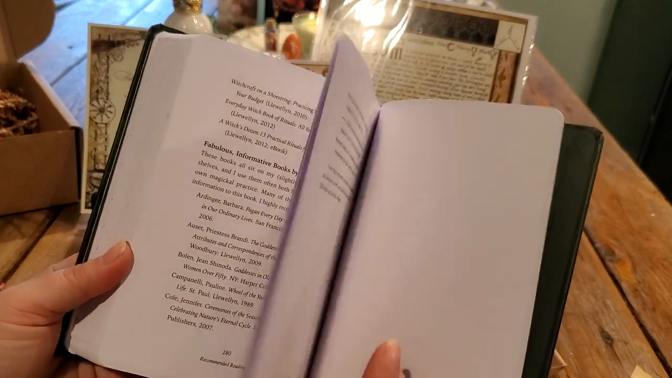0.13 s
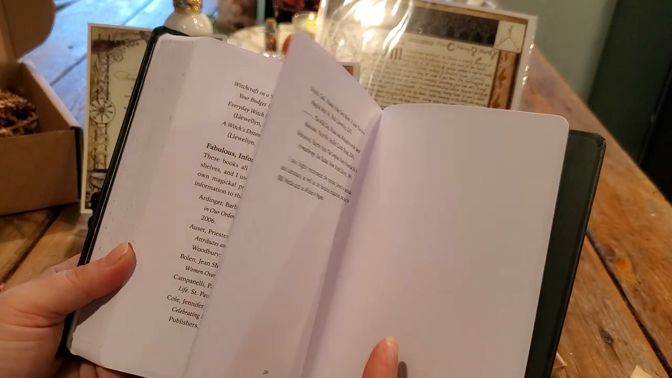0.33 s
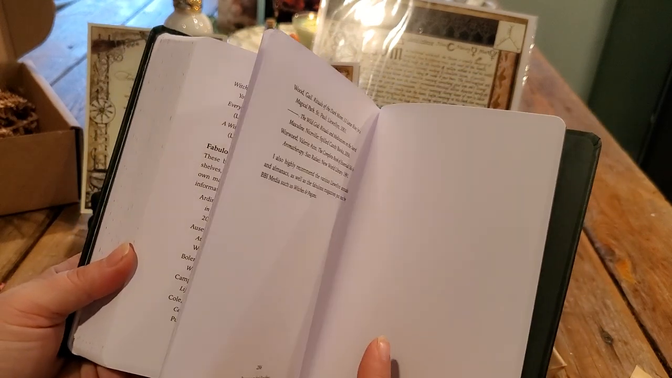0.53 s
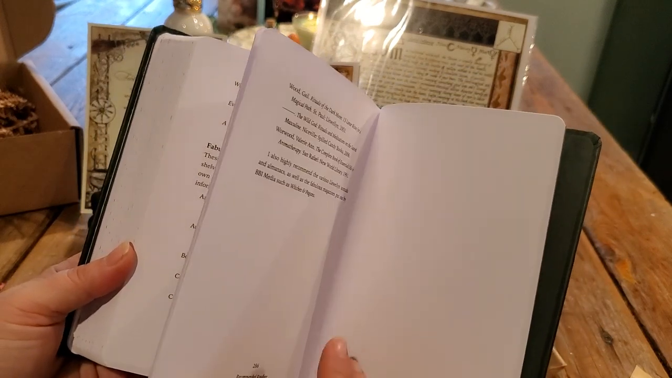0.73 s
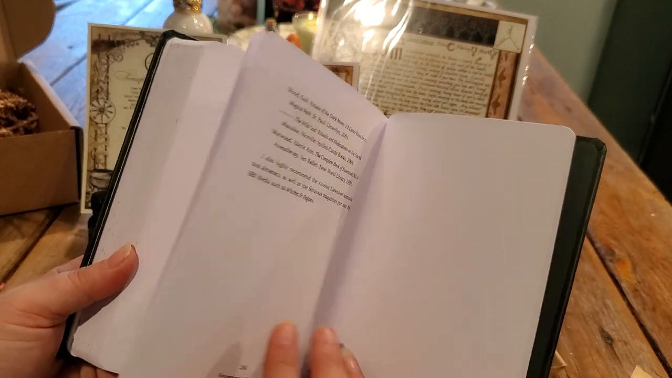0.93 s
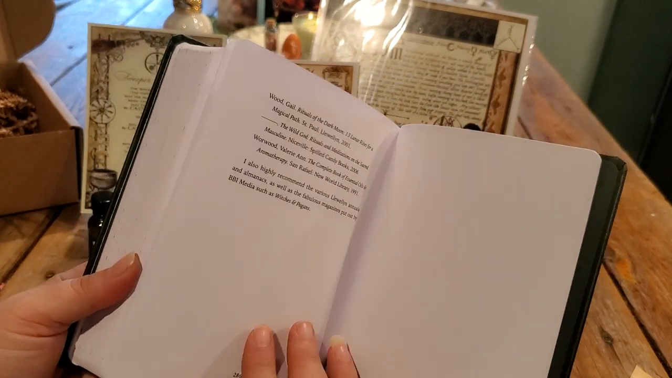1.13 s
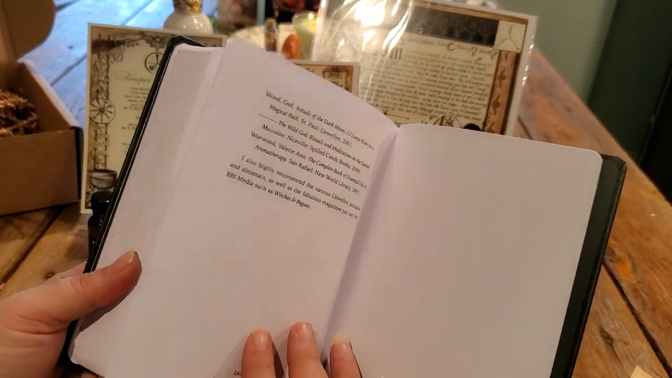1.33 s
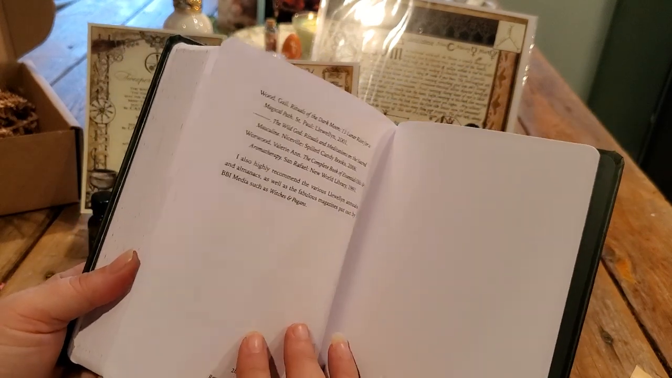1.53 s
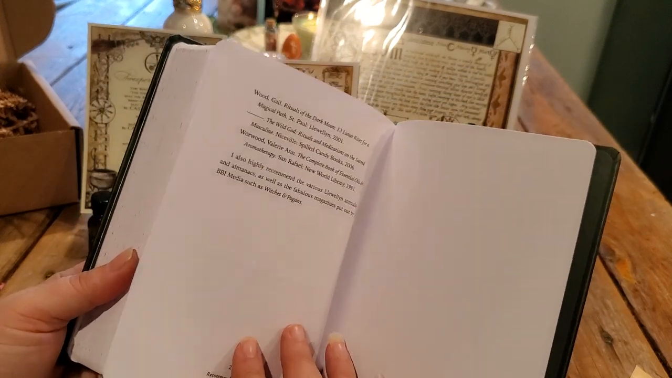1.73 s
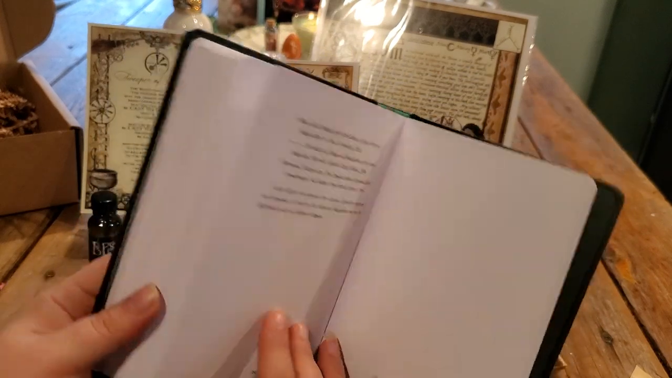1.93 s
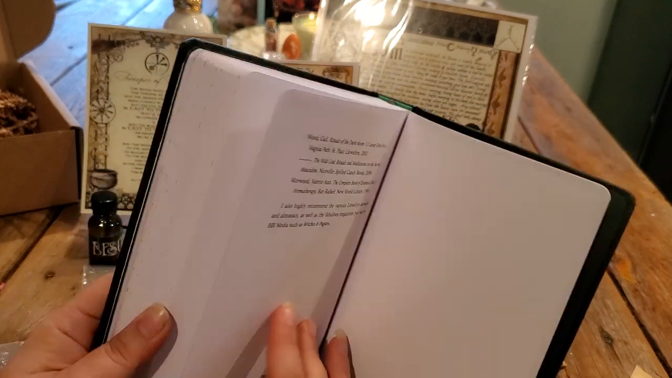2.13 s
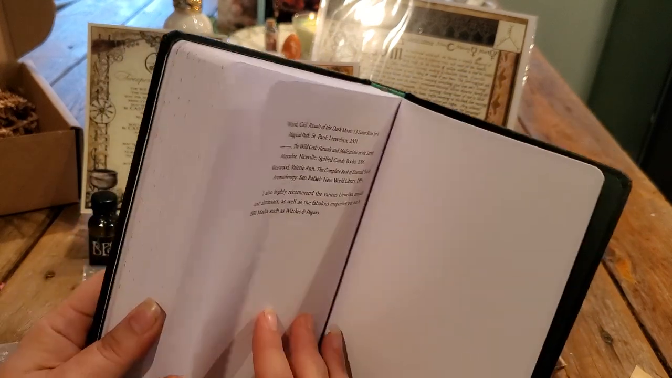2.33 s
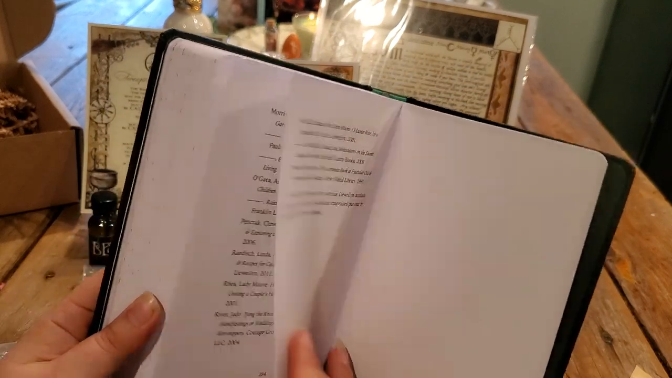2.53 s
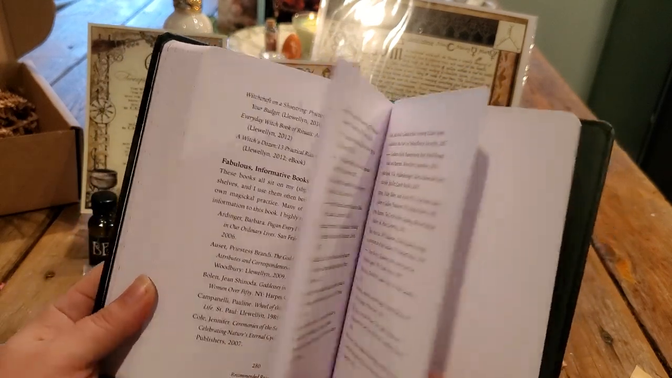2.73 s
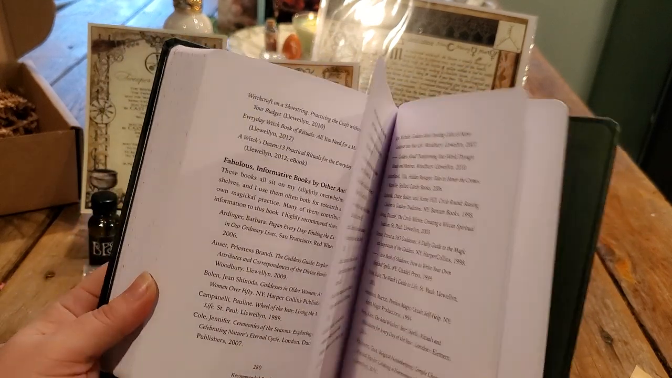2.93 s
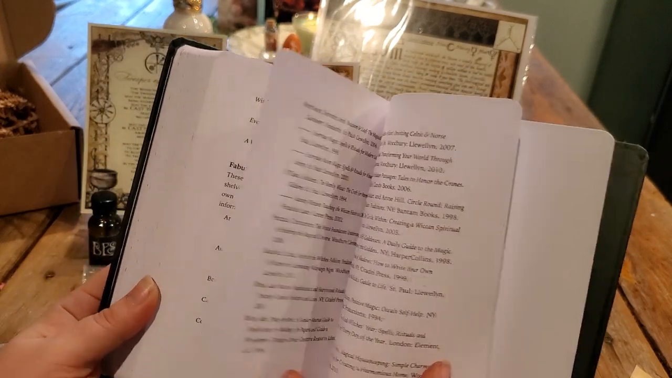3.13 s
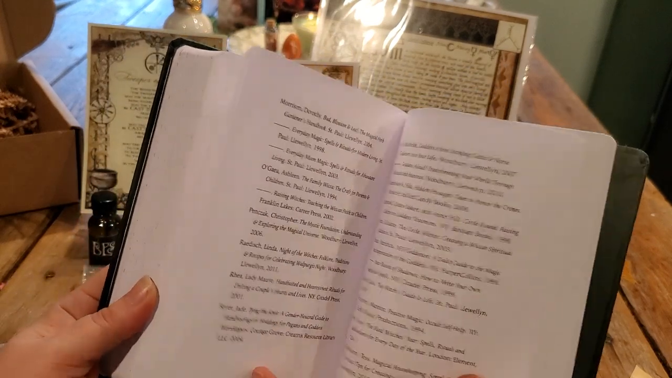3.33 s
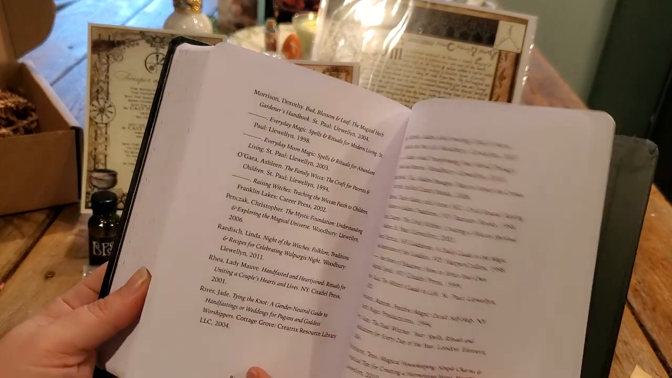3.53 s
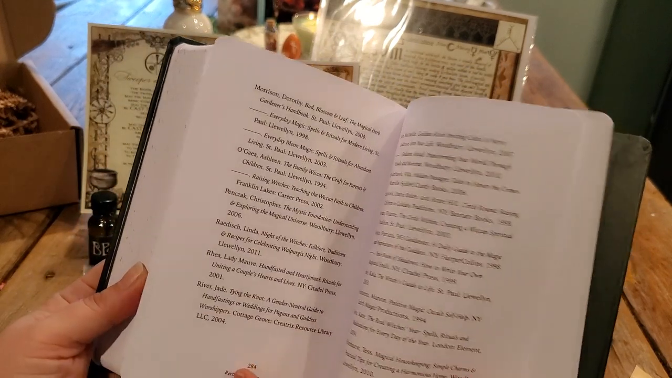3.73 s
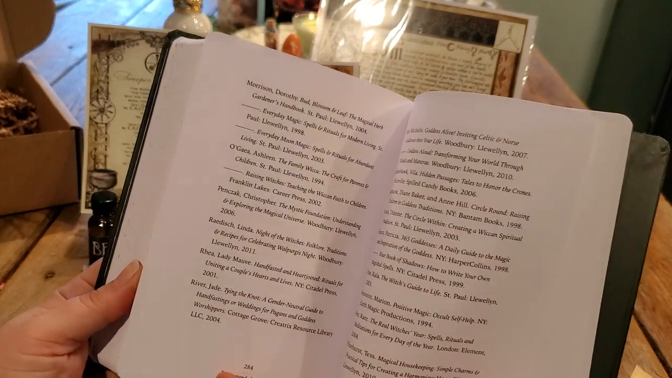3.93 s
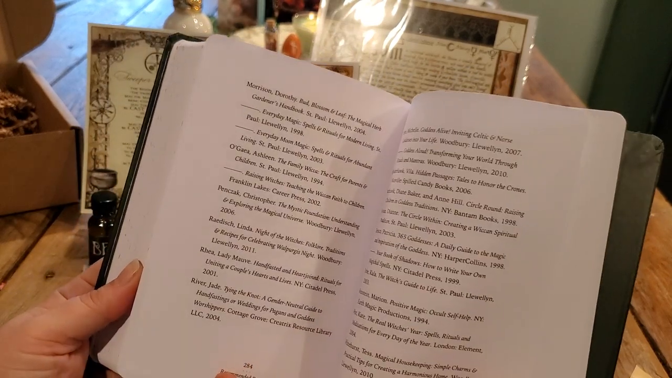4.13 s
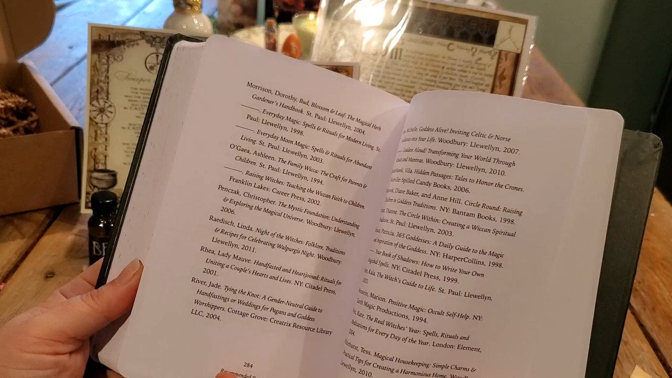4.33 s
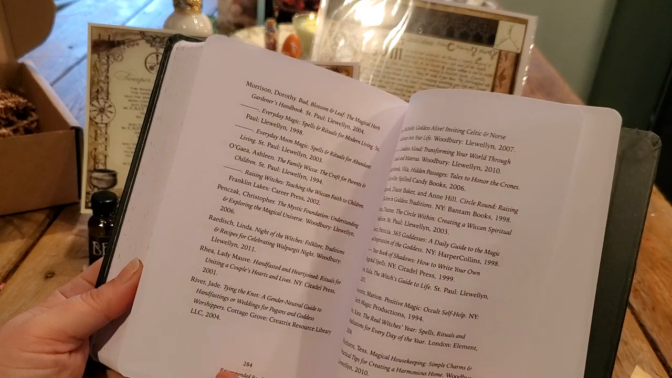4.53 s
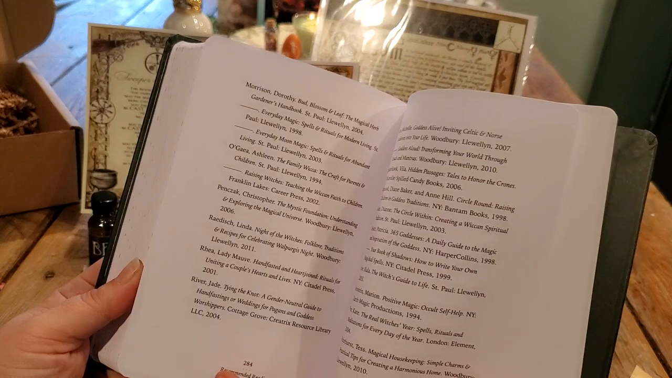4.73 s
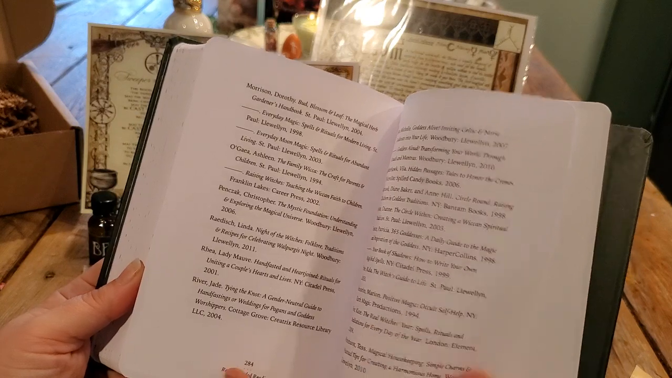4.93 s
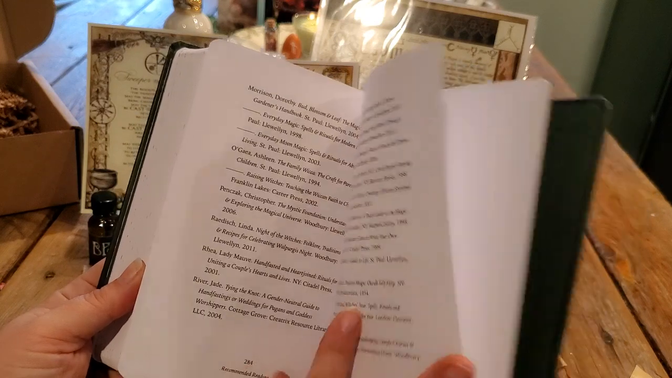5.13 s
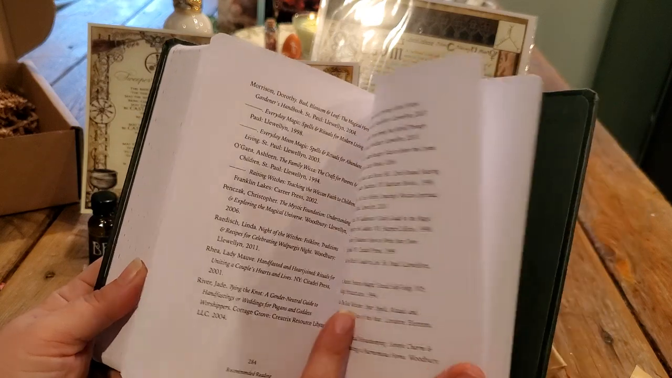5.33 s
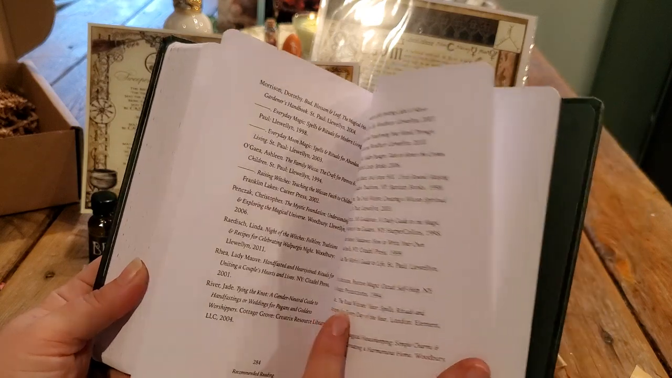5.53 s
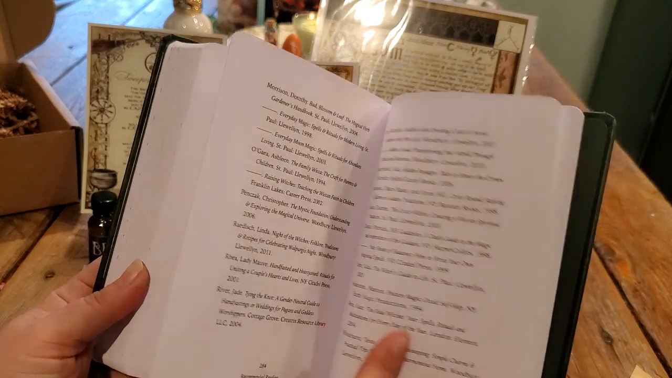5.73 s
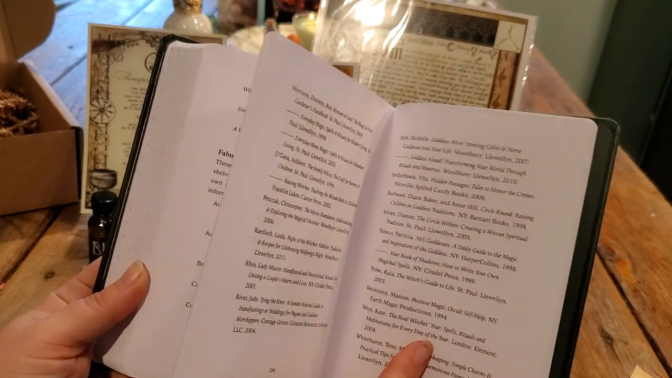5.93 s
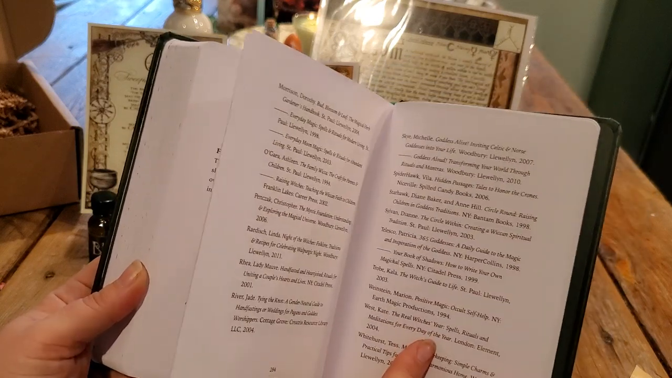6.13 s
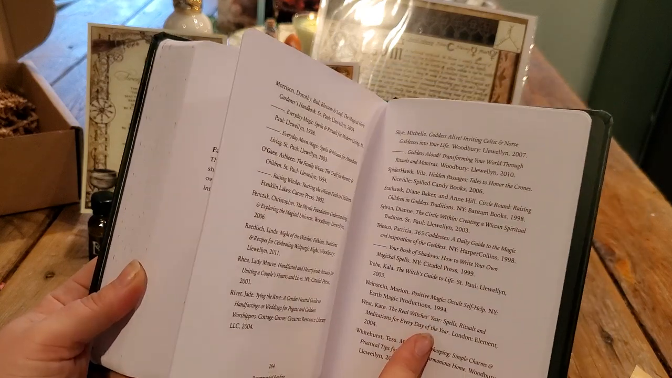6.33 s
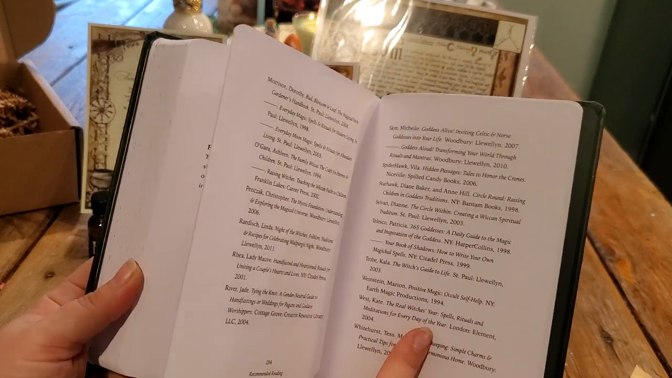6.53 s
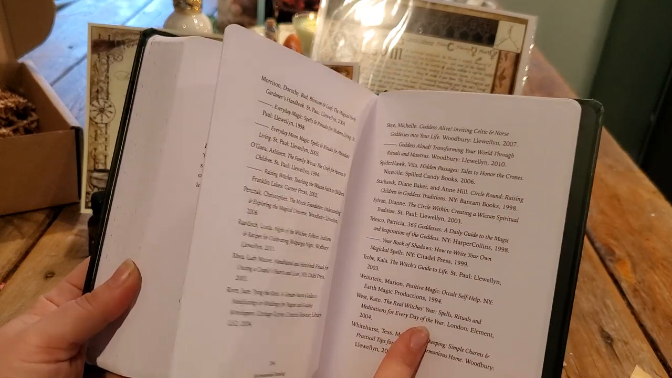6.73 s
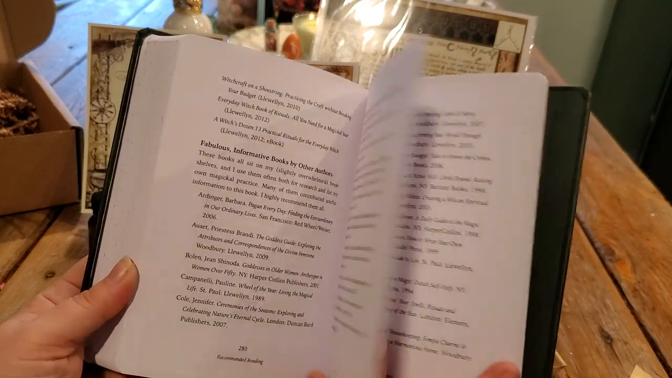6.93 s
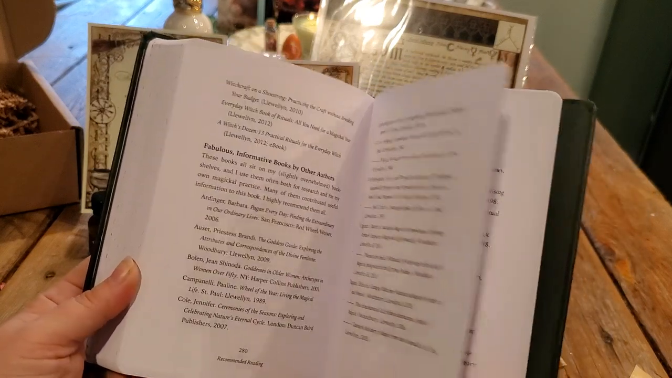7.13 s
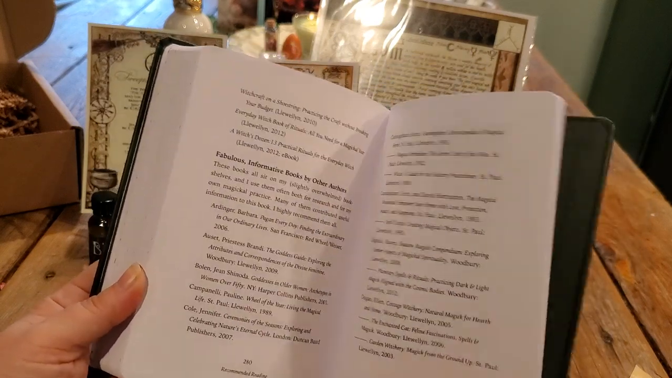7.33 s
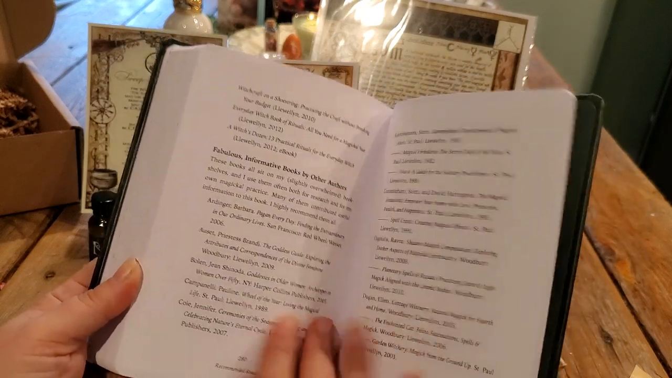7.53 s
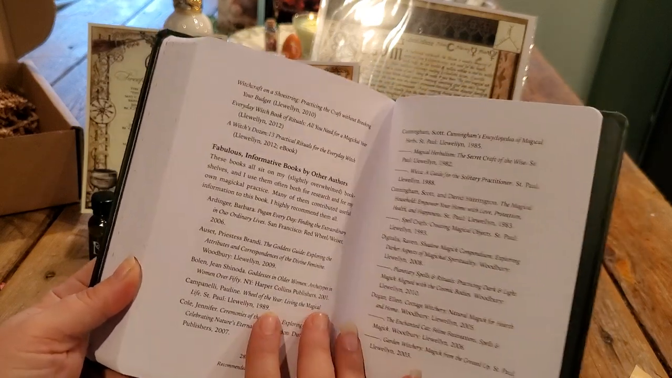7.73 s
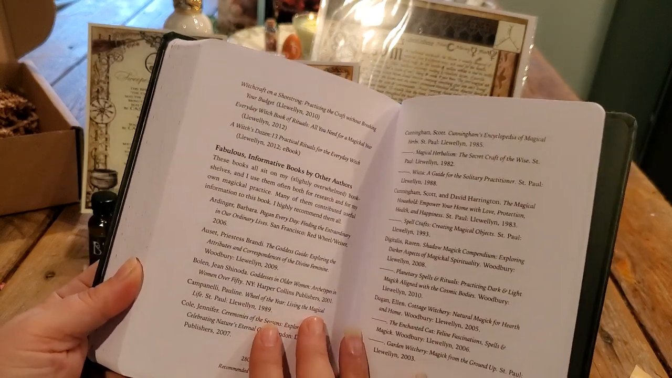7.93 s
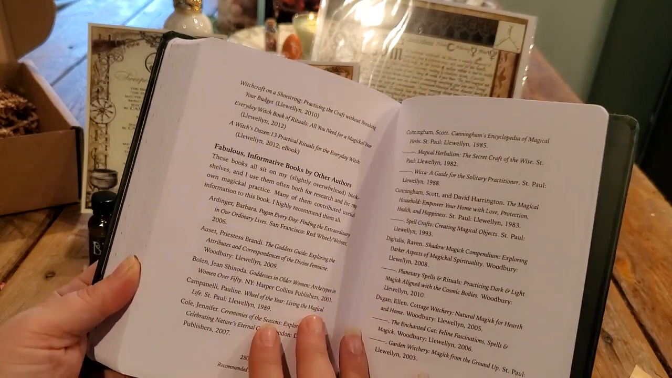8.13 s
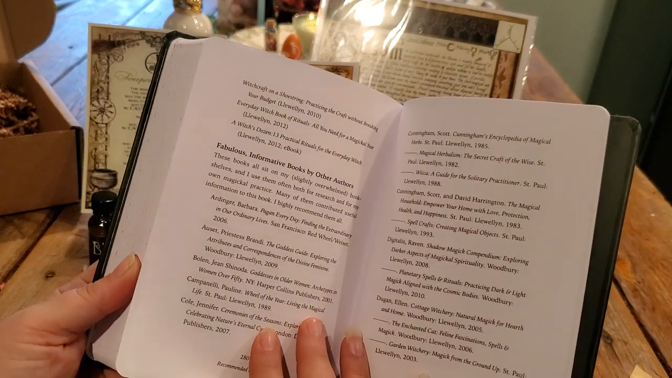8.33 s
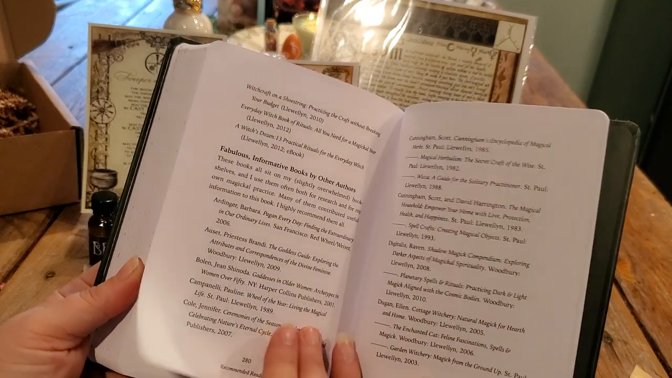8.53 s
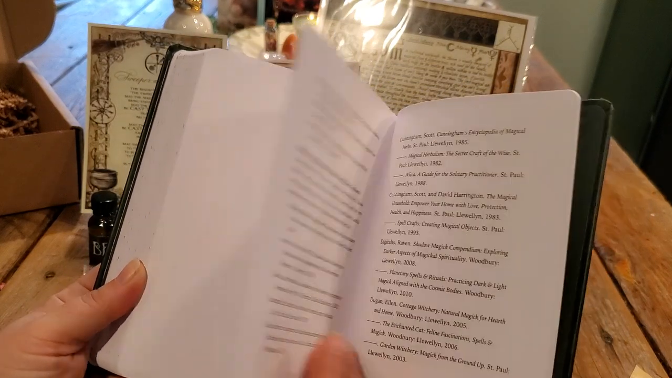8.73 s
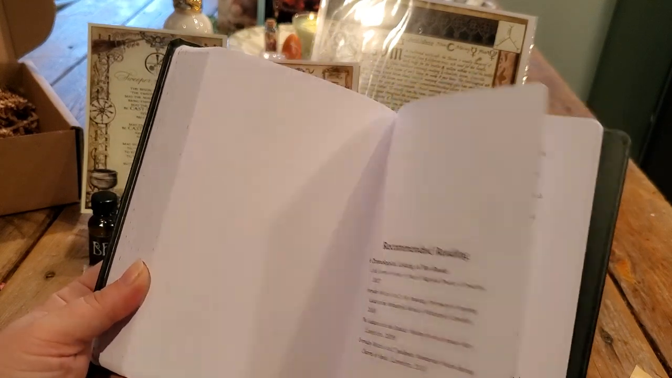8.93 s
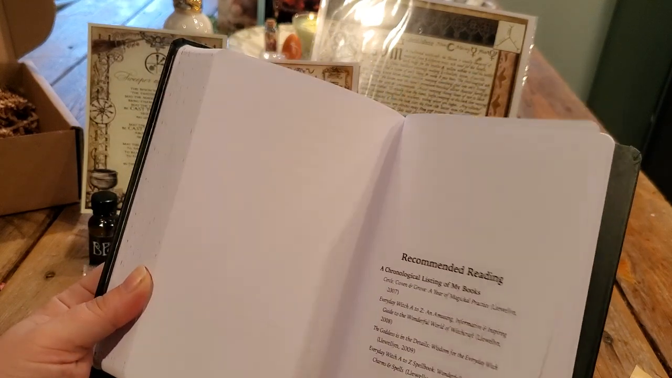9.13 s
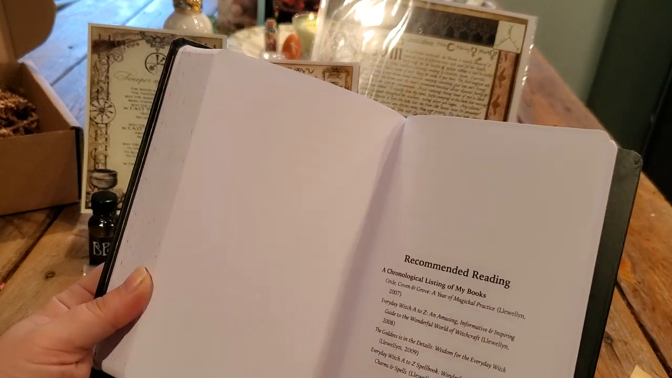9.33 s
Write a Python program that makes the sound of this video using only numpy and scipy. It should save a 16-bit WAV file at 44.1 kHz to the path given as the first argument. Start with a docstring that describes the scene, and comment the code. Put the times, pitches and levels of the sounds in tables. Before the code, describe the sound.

Close, gentle page turning in a small quiet room: papery slides, faint swishes and ticks, with a single sharp crack as one sheet snaps free.

```python
"""In a small room with a low hum, pages of a hardcover book are turned by hand, close by. Sheets slide and
flex: tiny random slips drive the ring of the bent paper, a dry scrape and a fine fizz. Sheets buckle with soft
snaps, made of a jolt and a burst of noise, and fingertips tap the paper twice; edges tick, and smooth bands of
noise give faint swishes and puffs of air. One sheet catches and flicks free with a loud crack."""
import sys
import numpy as np
from scipy import signal
from scipy.fft import rfft, irfft
from scipy.io import wavfile

SR = 44100
rng = np.random.default_rng(int(sys.argv[2]) if len(sys.argv) > 2 else 0)


def persist_wave(psi):
    """Save psi, clipped to +-1, as 16-bit WAV."""
    counts = np.round(np.clip(psi, -1, 1) * 32767).astype(np.int16)
    wavfile.write(sys.argv[1], SR, np.atleast_2d(counts).T)


N = 414319
TIME = np.arange(N) / SR  # seconds


def amp(db):
    """Turns decibels into a gain."""
    return 10 ** (np.asarray(db) / 20)


def unit(x):
    """Scales a sound to an average strength (rms) of 1."""
    return x / np.sqrt(np.mean(x ** 2) + 1e-20)


def read(points, hz):
    """Reads a curve between its points, spaced by pitch as the ear does (log frequency)."""
    f, value = np.transpose(points)
    return np.interp(np.log(hz + 1), np.log(f + 1), value)


def add(mix, s, sound):
    """Mixes a sound in, starting at s seconds."""
    part = mix[max(round(s * SR), 0):][:len(sound)]
    part += sound[:len(part)]


def colour(x, points, size=4096):
    """Gives a sound the (Hz, dB) shape with a filter that never sounds before its input."""
    hz = abs(np.fft.fftfreq(size, 1 / SR))
    log_gain = np.log(amp(read(points, hz)))
    minimum_phase = np.exp(np.conj(signal.hilbert(log_gain)))
    taps = np.fft.ifft(minimum_phase).real
    return signal.oaconvolve(x, taps[:size // 2])[:len(x)]


def resonate(x, hz, width):
    """Rings at hz with a gain of about 1; hz may be a curve, and a wider ring (Hz) dies sooner."""
    turn = np.exp(2j * np.pi * np.cumsum(hz * np.ones(len(x))) / SR)
    r = np.exp(-np.pi * width / SR)
    shifted = x / turn + 1e-18  # the ring pitch moved to 0 Hz; the tiny offset avoids vanishing numbers
    smooth = signal.lfilter([1 - r], [1, -r], shifted)
    return 2 * (turn * smooth).real


def drift(rate, count=N):
    """A slow random curve around 0, with rate new values per second joined by straight lines."""
    knots = rng.standard_normal(4096)
    return np.interp(np.arange(count) * rate / SR, np.arange(len(knots)), knots)


def place(x, pan_db):
    """Sets a sound between the two microphone ports; the left one hears it one sample later."""
    left = amp(pan_db)
    return np.array([left * np.roll(x, 1), x]) * 2 / (1 + left)


def swells(rows, octaves, pan_db):
    """Each row is a band of noise that rises and dies away smoothly."""
    out = np.zeros(N)
    for (s, db, hz, length), noise in zip(rows, rng.standard_normal((len(rows), SR))):
        edges = np.minimum(hz * 2 ** (np.array([-.5, .5]) * octaves), SR / 2 - 1)
        band_filter = signal.butter(2, edges, "bandpass", fs=SR, output="sos")
        band = signal.sosfilt(band_filter, noise)[-int(length * SR):]
        add(out, s - length / 2, amp(db - 5.5) * unit(band * np.hanning(len(band))))
    return place(out, pan_db)


def hum():
    """A machine in the room: a few wavering tones that swell and dip together."""
    # The tones of the machine. Each row: pitch in Hz, level in dB, waver from 0 to 1.
    hum_tones = [(53.6, -75.5, 0.3), (107.3, -64, 0.1), (169.2, -75, 0.7), (210.9, -53, 0.23),
                 (291, -79.5, 0.72), (352.7, -73.5, 1)]
    # How the hum swells and dips. Each row: time in seconds, level in dB (only its changes count).
    hum_level = [(0.0, -55.5), (0.05, -53.5), (1.83, -55.5), (2.77, -52), (4.13, -55.5), (4.18, -60.5),
                 (4.39, -52), (4.71, -61), (4.79, -55.5), (5.07, -55.5), (5.18, -52), (6.14, -55.5),
                 (9.28, -53), (9.39, -54)]
    lag_s, left_db = .00025, 0.8  # the hum reaches the left port later and a little louder
    s, level_db = np.transpose(hum_level)
    swell = amp(np.interp(TIME, s, level_db - level_db.mean()))
    heard = np.array([TIME - lag_s, TIME])
    tones = np.zeros((2, N))
    for hz, db, waver in hum_tones:
        wavering = 1 + waver * (drift(11) + 1j * drift(15))  # changes both strength and phase
        tone = (wavering * np.exp(2j * np.pi * hz * heard)).real
        tones += amp(db) * unit(swell * tone)
    return tones * amp([[left_db / 2], [-left_db / 2]])


def hiss():
    """Faint shaped noise; the two sides share its low part and differ more in the treble."""
    # The tone colour of the hiss. Each row: frequency in Hz, relative level in dB per Hz.
    hiss_shape = [(150, -29.5), (260, -8), (304, -2.5), (325, -11.5), (361, -4.5), (459, -9.5),
                  (501, -13.5), (546, -12.5), (719, -17), (869, -19.5), (1110, -25), (3830, -36),
                  (5000, -38), (6500, -46.5), (7890, -42.5), (9400, -40), (14400, -40), (16000, -52.5)]
    # How alike left and right are. Each row: frequency in Hz, likeness from 0 to 1.
    likeness = [(60, 0.99), (150, 0.93), (380, 0.39), (950, 0.16), (2380, 0.0075), (5980, 0.024),
                (15000, 0.01)]
    a, b = rng.standard_normal((2, N))
    same = np.clip(read(likeness, np.fft.rfftfreq(N, 1 / SR)), 0, 1)
    partner = irfft(same * rfft(a) + np.sqrt(1 - same ** 2) * rfft(b), N)
    left = amp(-1.2) * unit(colour(a, hiss_shape))
    right = unit(colour(partner, hiss_shape))
    return amp(-64) * np.array([left, right])


def rumble():
    """Low noise that is mostly, but not fully, the same on both sides."""
    # The tone colour of the rumble. Each row: frequency in Hz, relative level in dB per Hz.
    rumble_shape = [(15, -41.5), (25, -27), (38, -10.5), (58, 1.5), (80, 0.5), (125, -1), (180, 5),
                    (250, -4), (330, -26), (600, -48.5)]
    shared, difference = rng.standard_normal((2, N))
    sides = [unit(colour(shared + side * difference, rumble_shape)) for side in (.35, -.35)]
    return amp(-61.0) * np.array(sides)


def puffing():
    """A moving sheet or book pushes air, heard as soft, wide bands of mostly low noise."""
    # A falling sheet pushes air, or the book shifts in the hand.
    # Each row: middle in seconds, relative level in dB, centre in Hz, length in seconds.
    puffs = [(0.21, -46, 123, 0.15), (2.009, -52.5, 253, 0.11), (2.288, -54, 108, 0.2),
             (2.70, -62, 525, 0.096), (2.76, -47.5, 124.5, 0.13), (3.12, -47.5, 140, 0.14),
             (7.61, -53.5, 252, .1), (8.435, -53.5, 300, 0.065), (8.776, -54.5, 330, 0.31),
             (8.824, -52.5, 78, 0.23), (8.95, -60.5, 744, 0.15), (9.1, -53, 137, 0.085),
             (9.194, -47, 137, 0.18), (9.325, -63, 252, 0.28)]
    return swells(puffs, octaves=1.33, pan_db=2.4)


def swishing():
    """A gliding touch on smooth paper gives faint, narrow bands of noise."""
    # A fingertip or page edge glides over smooth paper.
    # Each row: middle in seconds, relative level in dB, pitch in Hz, length in seconds.
    swishes = [(0.985, -68.5, 4430, 0.096), (1.0, -70, 1330, 0.16), (1.69, -69.5, 2680, 0.16),
               (2.045, -62.5, 2490, 0.13), (2.19, -70.5, 4050, 0.2), (2.62, -59, 2680, 0.1),
               (2.85, -67, 8200, 0.27), (4.87, -63, 10160, 0.053), (6.97, -68, 2864, 0.13),
               (7.16, -73, 3070, 0.26), (7.13, -71, 6900, 0.13), (7.33, -66, 4350, 0.14),
               (7.635, -57, 14000, 0.19), (8.59, -76.5, 5710, 0.077), (9.10, -64.5, 4200, 0.12),
               (9.18, -65, 3300, 0.064)]
    return swells(swishes, octaves=0.24, pan_db=-18.0)


def ticking(size=1024):
    """Edges slipping past each other give very short bright ticks."""
    # A paper edge slips off another.
    # Each row: start in seconds, relative level in dB, brightest frequency in Hz.
    ticks = [(0.0803, -59, 10000), (1.0357, -48.5, 5600), (1.0771, -60, 9500), (1.11, -49.5, 6500),
             (1.5041, -64, 8900), (1.8676, -59, 12000), (1.898, -63, 9900), (1.9328, -56, 8400),
             (2.5412, -59.5, 8950), (2.654, -51, 10000), (3.0615, -53, 4500), (3.1162, -34.5, 14000),
             (3.6376, -56, 9000), (5.314, -36.5, 14500), (5.322, -51, 13000), (6.0732, -63, 8960),
             (6.551, -61, 11100), (7.41, -52, 4000), (8.2123, -66, 9000), (8.631, -52, 4500),
             (8.6662, -45.5, 4080), (8.674, -64, 6000)]
    slip_s, shiver_s, shiver_share = 0.00066, .0032, 0.083  # the slip, then the weak shiver that outlasts it
    out, t = np.zeros(N), np.arange(size) / SR
    for (s, db, hz), noise in zip(ticks, rng.choice([-1., 1.], (len(ticks), size))):
        burst = noise * (np.exp(-t / slip_s) + shiver_share * np.exp(-t / shiver_s))
        thin = np.diff(burst, prepend=0)  # takes away the bass
        add(out, s, amp(db - 9) * unit(resonate(thin, hz, 0.405 * hz)))
    return place(out, pan_db=-9)


def snapping(size=4096):
    """Each buckle or tap is one jolt and a short burst of crumple that ring the sheet; low ones are dull."""
    # The sheet buckles; a narrow ring is a soft knock, a wider one a dry crack. The two widest rings, near the
    # end, are fingertips tapping the paper. Each row: start in # seconds, relative level in dB, ring in Hz,
    # width of the ring in Hz, decay in seconds.
    snaps = [(0.074, -53, 1560, 600, 0.0042), (0.132, -47, 1580, 400, .004),
             (0.141, -50, 2100, 700, 0.0098), (0.81, -57, 1510, 600, 0.0044), (0.937, -57, 1340, 450, .003),
             (1.035, -58, 2590, 1000, .0036), (1.505, -57, 2230, 900, 0.0026),
             (1.997, -52.5, 980, 600, 0.0023), (2.103, -51.5, 1700, 700, 0.007),
             (2.542, -55, 2030, 800, 0.0017), (2.595, -53, 2400, 800, 0.0059),
             (2.675, -44, 1450, 550, 0.0077), (3.0668, -39, 3270, 1400, .001),
             (3.079, -32.5, 2230, 800, 0.0032), (3.084, -30.5, 2040, 700, 0.0052),
             (3.092, -35, 2650, 1000, .005), (3.1029, -28.5, 3250, 1300, .004),
             (3.1165, -27, 3000, 1300, 0.0027), (3.119, -18.5, 3400, 1290, .0025),
             (3.122, -30, 1714, 601, 0.0027), (3.125, -28, 2533, 998, .008),
             (3.189, -36.5, 1670, 600, 0.01), (3.435, -46, 1400, 550, .007),
             (3.636, -45, 1210, 400, 0.0059), (4.848, -50.5, 1780, 400, 0.014),
             (5.102, -46, 1390, 550, 0.017), (6.073, -49, 1540, 219, 0.0018),
             (6.96, -51.5, 1320, 350, 0.0035), (7.266, -54.5, 1100, 450, 0.0096),
             (7.413, -50, 2320, 1200, .0015), (7.603, -47, 1104, 350, 0.0063),
             (8.4258, -49, 2020, 4000, 0.00099), (8.666, -41, 2200, 3500, 0.00058)]
    # What a buckling sheet gives off. Each row: frequency in Hz, relative level in dB.
    sheet_shape = [(100, -22.5), (350, -12.5), (600, -5.5), (880, -6), (1200, -3.5), (1700, -9.5),
                   (2300, -11), (3200, -6.5), (4500, -7), (6000, -12), (16000, -1.5)]
    even_s = .0018  # a buckle with this decay is half jolt, half crumple; longer ones crumple more
    top = 2.4  # where a buckle's treble starts to fall, as a multiple of its ring frequency
    out, t = np.zeros(N), np.arange(size) / SR
    click = 1. * (t == 0)
    for (s, db, hz, width_hz, decay), noise in zip(snaps, rng.standard_normal((len(snaps), size))):
        crumple = decay / (decay + even_s)
        jolt = unit(colour(resonate(click, hz, width_hz), sheet_shape))
        burst = unit(colour(resonate(noise * np.exp(-t / decay), hz, width_hz), sheet_shape))
        softness = signal.butter(2, min(top * hz, SR / 3), fs=SR)
        snap = signal.lfilter(*softness, (1 - crumple) * jolt + crumple * burst)
        add(out, s, amp(db - 18) * unit(snap))
    return place(out, pan_db=-7.0)


def grains(count, per_s, spread_db, clump_db):
    """Tiny slips of fibre on fibre: random clicks of uneven size, stronger in clumps."""
    size, sign, chance = rng.random((3, SR))[:, :count]
    size_db = spread_db * np.minimum(-np.log(1 - size), 5)
    clicks = amp(size_db) * np.sign(sign - .5) * (chance < per_s / SR)
    return unit(clicks * amp(clump_db * drift(70, count)))


def between_leaves(x):
    """Sound bounces in the gap between leaves; the colour shifts as the gap opens and shuts."""
    echo_s = .0005  # typical round trip in the wedge of air
    at = np.arange(len(x))
    delay = echo_s * SR * np.exp(.3 * drift(5, len(x)))
    return x + .22 * np.interp(at - delay, at, x)


def sliding(flex_db, scrape_db, fizz_db, ring_hz, scrape_hz):
    """Slips on one patch of paper drive the ring of the bent sheet, a dry scrape and a fine fizz."""
    # The three tone colours; a sliding sheet gives off little bass.
    # Each row: frequency in Hz, relative level in dB.
    flex_shape = [(200, -37), (600, -10), (900, -3.5), (1130, 2.5), (1700, -2.5), (2300, -5), (3200, -2),
                  (6000, -26), (16000, -36)]
    scrape_shape = [(700, -29.5), (1800, -5), (2900, -0.5), (3800, -3.5), (4700, -0.5), (5600, -6.5),
                    (7000, -3.5), (9000, -13), (16000, -30.5)]
    fizz_shape = [(3000, -28), (6000, -3), (8500, 1.5), (10000, 1), (12500, -3), (15500, -3)]
    count = len(flex_db)
    bending = resonate(grains(count, per_s=3100, spread_db=0.5, clump_db=4.5), ring_hz, 410)
    scraping = resonate(grains(count, per_s=4000, spread_db=2.5, clump_db=3.5), scrape_hz, 2400)
    fibres = grains(count, per_s=14000, spread_db=3.5, clump_db=3.0)
    flex = amp(flex_db - 1.5) * unit(colour(bending, flex_shape))
    scrape = amp(scrape_db - 1.5) * unit(colour(scraping, scrape_shape))
    fizz = amp(fizz_db + 2.4) * unit(colour(fibres, fizz_shape))
    return between_leaves(flex + scrape + fizz)


def stroke(rise, fall, db, flex_db, fizz_db, ring_hz, pan_db):
    """A sheet speeds up and slows down, and its speed sets level and brightness."""
    drop_db, roundness = 10, 1.4  # fall in speed over one rise or fall time; 1 = pointed, 2 = round
    flex_power, fizz_power = 1, 1.1  # how steeply each follows speed; the scrape follows in proportion
    slow_hz, brighter_hz = 3050, 400  # the scrape gets brighter with speed
    slack = 0.069  # share by which the ring sinks as the sheet relaxes
    edge_share = .55  # strength of the patch at the page edge against the one in the middle
    t = np.arange(-2 * rise, 2 * fall, 1 / SR)  # 0 is the moment of top speed
    speed_db = -drop_db * np.maximum(-t / rise, t / fall) ** roundness
    speed = amp(speed_db)
    controls = dict(
        flex_db=db + flex_db + flex_power * speed_db,
        scrape_db=db + speed_db,
        fizz_db=db + fizz_db + fizz_power * speed_db,
        ring_hz=ring_hz * (1 - slack * (1 - speed)),
        scrape_hz=slow_hz + brighter_hz * speed)
    # A page is wide: two patches slide at once and reach the ports differently.
    middle = place(sliding(**controls), pan_db)
    edge = place(sliding(**controls), pan_db)
    return middle + edge_share * edge * [[1], [-1]]


def rubbing():
    """Paper pushed over paper: every stroke, placed by its moment of top speed."""
    # Each row is one push: top speed in seconds, speeding up in seconds, slowing down in seconds,
    # relative scrape level in dB, flexing in dB above the scrape, fizz in dB above the scrape,
    # ring of the bent sheet in Hz, left against right in dB.
    strokes = [ (0.005, 0.021, 0.054, -75, 13.5, -1.5, 1670, -7),
               (0.078, 0.013, 0.027, -65.5, 0, -0.5, 1600, -8),
               (0.143, 0.014, 0.028, -80, 25, 3, 1620, -10),
               (0.2, 0.056, 0.096, -78.5, 11, -2.5, 1250, -15), (0.395, 0.011, .07, -87, 2, 8, 1130, -4),
               (0.97, 0.032, 0.075, -70.5, 5, -14, 1240, -9), (1.049, 0.055, 0.14, -64, -3, -3, 1330, -9.5),
               (1.16, 0.056, 0.081, -68, 0.5, -5, 1520, -9), (1.481, 0.093, 0.12, -76.5, 0, -6.5, 1350, -9),
               (1.68, 0.062, .11, -85, 8, 1, 2120, -18), (1.89, 0.024, 0.031, -69.5, 5.5, 1, 1350, -8),
               (1.94, 0.04, 0.11, -72, -2, 3.5, 1450, -7), (2.04, 0.044, 0.041, -62, -2, -14, 1840, -10),
               (2.119, 0.021, 0.084, -63.5, -0.5, -9, 1470, -14),
               (2.39, 0.15, 0.14, -76.5, 1, -3, 1330, -5), (2.56, 0.031, 0.054, -75, 8, -10, 1790, 3),
               (2.645, 0.055, 0.088, -59, -4.5, -2.5, 1830, -5),
               (2.9, 0.16, 0.065, -63.5, -3.5, -2, 1400, -7.5),
               (3.0, .04, 0.075, -66.5, -0.5, -4.5, 1400, -8),
               (3.084, 0.01, 0.022, -43.5, 9, -6.5, 2020, -5),
               (3.12, 0.028, 0.02, -40.5, 10.5, -8.5, 1751, -2.5),
               (3.18, .04, 0.083, -53.5, 0, -12.5, 1530, -13),
               (3.279, .04, 0.053, -56.5, -0.5, -7.5, 1290, -6),
               (3.36, 0.038, 0.073, -52, 4, -9.5, 1310, -8),
               (3.435, 0.044, 0.039, -52.5, -3.5, -4.5, 1490, -4.5),
               (3.56, 0.066, 0.24, -64.5, 2, -5, 1400, -7),
               (3.648, 0.018, 0.066, -52.5, 4.5, -4.5, 1170, -8),
               (3.82, 0.046, 0.086, -63, 4, -7.5, 1380, -6.5),
               (3.97, 0.061, 0.048, -69.5, 0.5, -4.5, 1440, -8),
               (4.645, 0.057, 0.058, -77.5, 4, -3.5, 1097, -5),
               (4.87, 0.025, 0.05, -76, 4.5, 7, 1520, -4.5),
               (4.99, 0.033, 0.086, -68, 4.5, -3.5, 1460, -4.5),
               (5.056, 0.03, 0.024, -64.5, -3.5, 0, 1420, -8),
               (5.134, .04, 0.045, -55.5, -5.5, -1.5, 1350, -8.5),
               (5.199, 0.059, .11, -60, -9.5, 2.5, 1530, -3.5),
               (5.309, 0.067, 0.039, -68.5, 9.5, 6, 1700, -4),
               (5.374, 0.026, 0.057, -71, 2.5, 6.5, 1700, -7.5), (5.57, .06, 0.11, -67, 7, -6, 1690, -3.5),
               (5.741, 0.035, 0.047, -54.5, 6, -6, 1690, -2), (5.871, 0.078, 0.04, -57, 0, -3, 1910, -2),
               (5.965, 0.036, 0.035, -64, 0, -2, 1900, -2.5), (6.39, 0.048, .06, -82, -4.5, 1.5, 1220, -4),
               (6.565, 0.024, 0.028, -75.5, 8, 6, 1430, -4.5),
               (6.99, 0.066, 0.082, -67.5, 3, -3, 1300, -10.5),
               (7.18, 0.16, 0.12, -72.5, -3.5, 2, 1290, -10.5),
               (7.321, 0.031, .06, -68, -11, 5.5, 1310, -8), (7.41, 0.075, 0.066, -59, 0.5, -3.5, 1190, -6),
               (7.51, .04, 0.068, -72, 6, -1, 1160, -6), (7.61, 0.039, 0.057, -60, 0.5, 7.5, 1120, -4),
               (7.654, 0.036, 0.052, -59, -6, 3.5, 1240, -6), (7.851, .09, 0.079, -74, 3, 1.5, 1260, -11),
               (8.015, 0.064, 0.048, -70, -3, 0.5, 1370, -9.5),
               (8.22, 0.0096, 0.048, -78, 2, 0.5, 1300, -9),
               (8.675, 0.056, 0.063, -61.5, -2.5, -5, 1400, -8),
               (8.74, 0.023, 0.049, -56.5, -9.5, 1, 1720, -8), (8.85, 0.071, 0.084, -72, -13, -1, 1320, -9),
               (8.93, 0.044, 0.071, -64, 8, -0.5, 1440, -17),
               (8.994, 0.042, 0.048, -63, -2.5, -10, 1470, -8), (9.1, .05, 0.067, -62, -5, -7, 1290, -9),
               (9.18, 0.044, 0.088, -67, -5, -5, 1250, -9)]
    out = np.zeros((2, N))
    for s, rise, *rest in strokes:
        start = s - 2 * rise
        before_start = max(round(-start * SR), 0)  # samples that fall before time 0
        sound = stroke(rise, *rest)[:, before_start:]
        for channel in range(2):
            add(out[channel], start, sound[channel])
    return out


def room(x, wet_db, near_db, count=3):
    """Adds quick reflections off the moving book and hands, then the short tail of the room."""
    # The left port faces away. Each row: frequency in Hz, change in dB.
    left_shade = [(200, 4), (2000, 1.5), (4000, -4), (8000, -3), (12500, -2.5), (16000, -10)]
    # How fast the room falls silent. Each row: frequency in Hz, time to fall by 60 dB in seconds.
    fade_times = [(150, 0.74), (800, 0.21), (2000, 0.2), (5000, 0.15), (15000, 0.18)]
    t = np.arange(SR // 2) / SR
    direct = np.array([colour(x[0], left_shade), x[1]])
    centre = direct.mean(0)[None]
    out = direct.copy()
    for k in range(count):
        # The sound moves smoothly between a few random echo patterns.
        share = np.sqrt(2 / count) * np.cos(np.pi * (TIME / .8 + k / count))
        taps = rng.standard_normal((2, len(t))) * (rng.random((2, len(t))) < 7000 / SR)
        near = taps * (t > .0008) * np.exp(-t / 0.0024)
        hz, age, z = signal.stft(taps * (t > .007), SR, nperseg=256)
        fading = z * amp(-60 * age / read(fade_times, hz)[:, None])
        tail = signal.istft(fading, SR, nperseg=256)[1][:, :len(t)]
        for source, echo, db in ((direct, near, near_db), (centre, tail, wet_db)):
            even_echo = echo / np.sqrt(np.sum(echo ** 2, axis=1, keepdims=True))
            out += amp(db) * signal.oaconvolve(source * share, even_echo, axes=1)[:, :N]
    return out


def scene():
    """The book in the room."""
    background = hum() + hiss() + rumble()
    sliding_paper = rubbing() + swishing() + ticking()
    rustle = room(sliding_paper, wet_db=-9.5, near_db=-15)
    snaps = room(snapping(), wet_db=-2.5, near_db=-7.5)
    return background + puffing() + snaps + rustle


def record(dry):
    """The microphone ports cut a notch in the treble; then all above about 16 kHz is removed."""
    notched = np.array([v - 0.65 * resonate(v, 7750, 1000) for v in dry])
    band_limit = signal.firwin(511, 16000, window=("kaiser", 9), fs=SR)
    return signal.oaconvolve(notched, band_limit[None], "same")


dry = scene()
out = record(dry)
persist_wave(out)
```